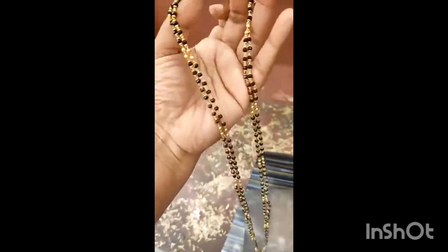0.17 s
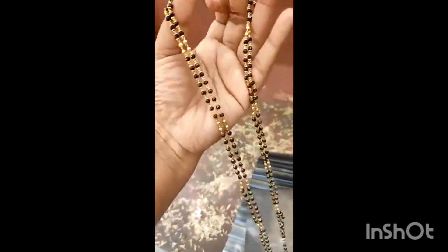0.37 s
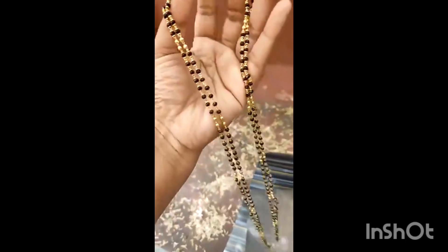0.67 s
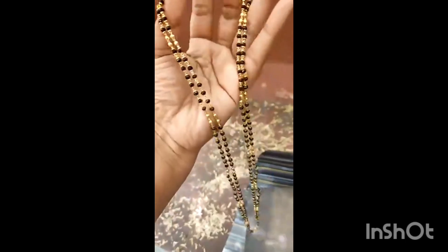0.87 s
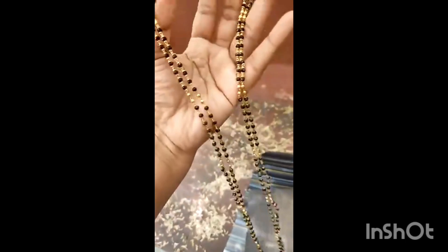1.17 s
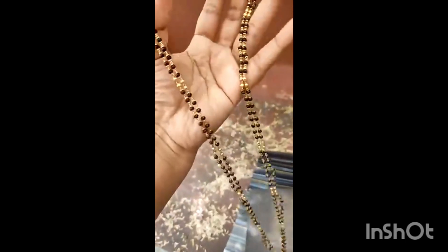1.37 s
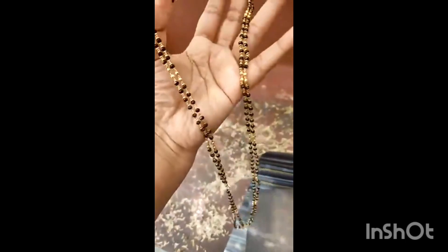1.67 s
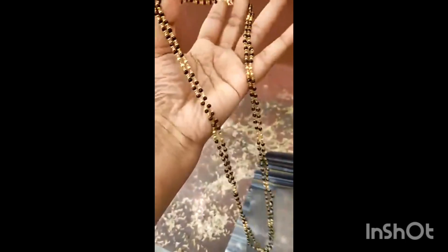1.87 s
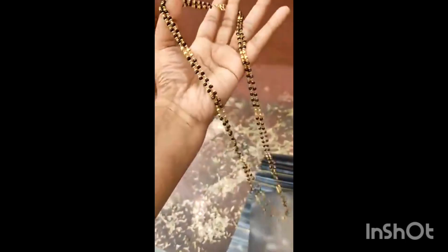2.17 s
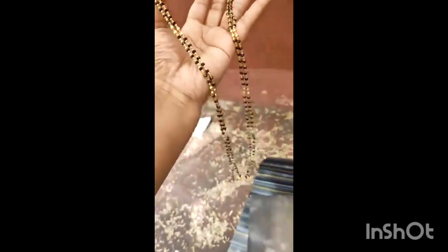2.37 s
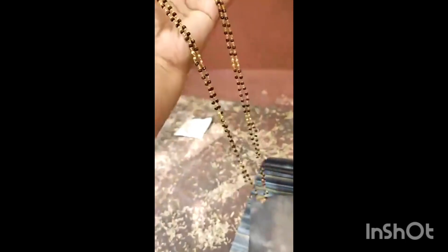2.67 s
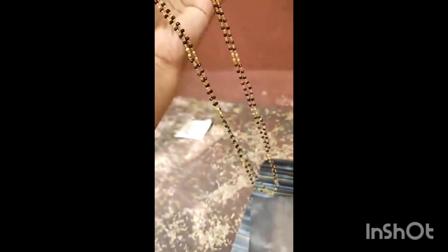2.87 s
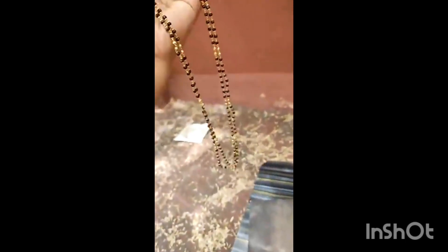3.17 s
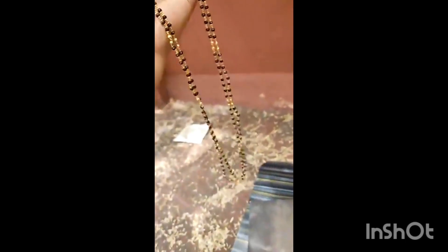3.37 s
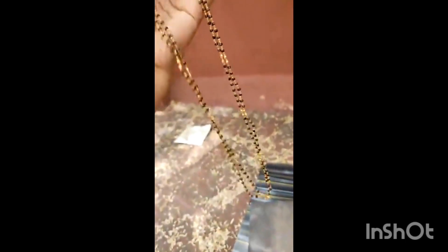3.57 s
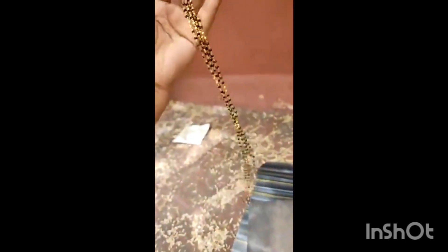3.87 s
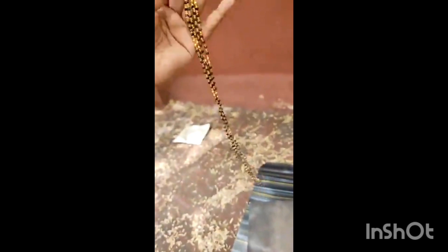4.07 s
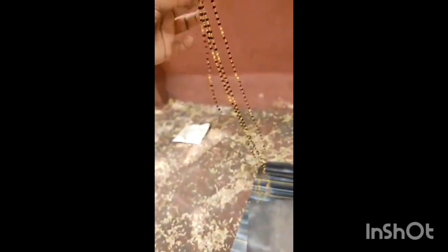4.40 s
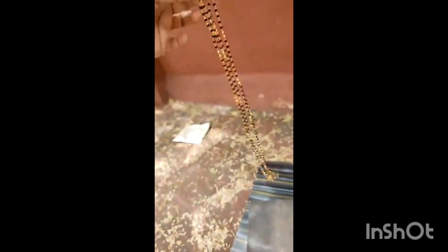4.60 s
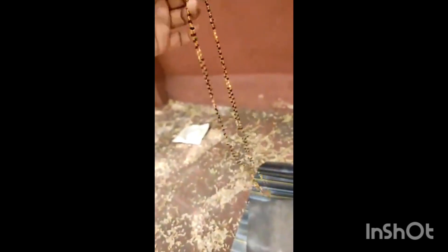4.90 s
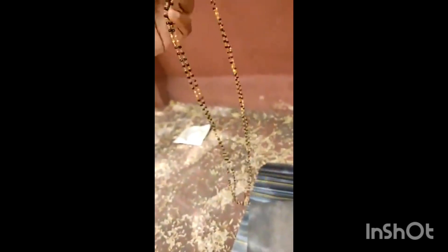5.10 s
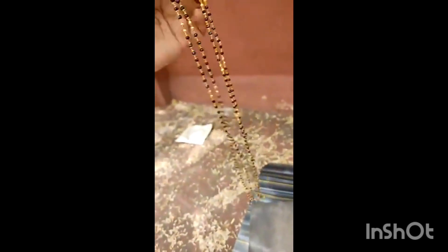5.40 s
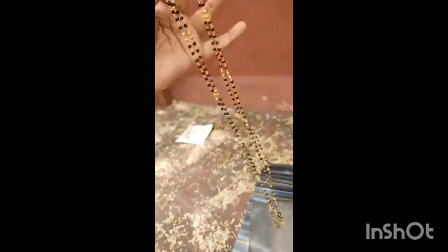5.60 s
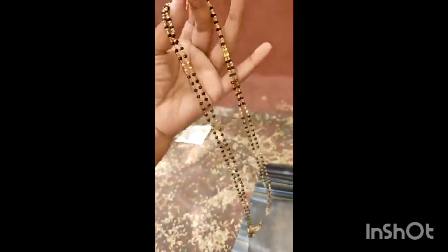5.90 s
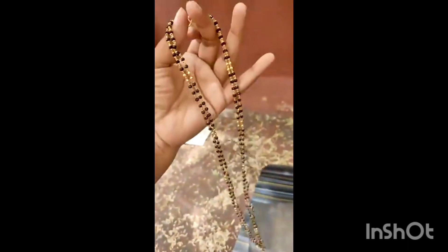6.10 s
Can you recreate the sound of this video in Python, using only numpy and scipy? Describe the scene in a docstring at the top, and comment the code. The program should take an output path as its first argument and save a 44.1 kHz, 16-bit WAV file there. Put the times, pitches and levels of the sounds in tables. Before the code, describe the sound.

A small room with a faint, steady hiss and barely audible thin tones, heard close in mono. At 0 seconds a soft skin rub, low microphone rumble and a light bump fade within about 0.2 seconds, with one faint clink. Quiet hiss holds until about 2.0, when the hand stirs. From 2.2 to 2.5 comes a busy flurry: beads slide and rasp, bright little clinks crowd together near a 2 kilohertz ring, and a strand gives a low short squeak. Single clinks follow around 2.9, 3.0, 3.25 and 3.35. From 3.5 to 4.7 the handling turns duller: soft bumps, dry ticks and rubs, strongest near 3.7 and 3.9, with a tiny high squeak at 3.85. A very faint thin whistle falls from 4.45 to 4.85. Hiss remains, with an almost inaudible clink at 5.4, until a hard, bright clack at 6.0, its tail cut short by the ending.

```python
"""Beaded chain handled above a workbench

A beaded gold chain is lifted and turned by hand, close to a mono microphone in a small shop.
Filtered noise and grains make the slides and rubs; damped sines and noise bursts make clinks, ticks, bumps
and, near the end, one hard clack. Squeaks and a thin whistle are gliding sines.
Under all lie a steady noise hiss and faint sine tones."""
import sys
import numpy as np
from scipy import signal
from scipy.fft import rfft, irfft, next_fast_len
from scipy.io import wavfile
from scipy.ndimage import uniform_filter1d, map_coordinates

SR = 44100
rng = np.random.default_rng(int(sys.argv[2]) if len(sys.argv) > 2 else 0)


def dump(signal):
    """Clip the signal to [-1, 1] and save it as 16-bit WAV at the path in sys.argv[1]."""
    limited = np.clip(np.atleast_2d(signal).T, -1, 1)
    pcm = np.round(limited * 32767).astype(np.int16)
    wavfile.write(sys.argv[1], SR, pcm)


N = 275625

# Spectrum of skin contact, for rubs and bumps. Each row: frequency in Hz, relative density in dB per Hz.
SKIN_SPECTRUM = [(50, -32.5), (120, -0.5), (230, 2.5), (320, 2.5), (480, 8.5), (700, 1), (1400, -40)]


def amp(db):
    """Amplitude ratio of a level in dB."""
    return 10 ** (np.asarray(db) / 20)


def unit(x):
    """x scaled to rms 1."""
    return x / np.sqrt(np.mean(x ** 2) + 1e-20)


def along(points, hz):
    """Interpolate (Hz, value) points on a log frequency axis."""
    point_hz, value = np.transpose(points)
    return np.interp(np.log(hz + 1), np.log(point_hz + 1), value)


def wobble(knots_per_s):
    """A smooth random curve through normally distributed knots."""
    knots = rng.standard_normal(int(N * knots_per_s / SR) + 4)
    return map_coordinates(knots, [np.arange(N) * knots_per_s / SR])


def colour(x, shape_db):
    """Causal minimum-phase filter, from the folded cepstrum of a gain in dB over frequency."""
    m = 2 * next_fast_len(len(x) // 2 + 4096)
    gain = amp(shape_db(np.fft.rfftfreq(m, 1 / SR)))
    cepstrum = irfft(np.log(gain + 1e-6))
    cepstrum[1:m // 2] *= 2
    cepstrum[m // 2 + 1:] = 0
    response = np.exp(rfft(cepstrum))
    return irfft(rfft(x, m) * response)[:len(x)]


def shaped(x, spectrum):
    """x filtered by the given spectrum, at rms 1."""
    return unit(colour(x, lambda hz: along(spectrum, hz)))


def fade(t60_s, attack_s):
    """Half a second of envelope: quick rise, exponential decay."""
    t = np.arange(SR // 2) / SR
    return np.exp(-np.log(1000) * t / t60_s) * (1 - np.exp(-t / attack_s))


def burst(shape_db, t60_s, attack_s):
    """A dying puff of coloured noise, with the energy of its envelope."""
    envelope = fade(t60_s, attack_s)
    puff = colour(rng.standard_normal(len(envelope)) * envelope, shape_db)
    return puff * np.linalg.norm(envelope) / np.linalg.norm(puff)


def ring(modes, attack_s):
    """Damped sine modes, struck at slightly new strengths and random phases each time."""
    t = np.arange(SR // 2) / SR
    out = np.zeros(len(t))
    for hz, level_db, t60_s in modes:
        strength = amp(level_db + rng.normal())
        sine = np.sin(2 * np.pi * (hz * t + rng.random()))
        out += strength * sine * fade(t60_s, attack_s)
    return out


def grains(contacts_per_s, smooth):
    """Tiny contacts of uneven size over a bed of friction noise at rms smooth."""
    contacts = rng.standard_normal(N) * (rng.random(N) < contacts_per_s / SR)
    return unit(contacts) + smooth * rng.standard_normal(N)


def resonant(x):
    """x coloured by the fixed resonances of strand and hand."""
    # Each row: centre in Hz, width in Hz, lift in dB.
    peaks = [(311, 85, 1.5), (449, 30, 6), (700, 26, 1.5), (996, 82, 2.5), (1324, 48, 4.5), (1655, 45, 7.5),
             (2160, 82, 5), (2530, 110, 5), (3360, 81, 5), (4340, 670, 2), (6900, 440, -7)]
    return colour(x, lambda f: sum(db / (1 + (2 * (f - hz) / width) ** 2) for hz, width, db in peaks))


def swells(rows, fall_db_per_s, level_column):
    """Gain per sample: each move rises along a Gaussian, then dies at a steady rate; powers add."""
    start_below_top_db = 20  # one rise time before the top
    t, power = np.arange(N) / SR, np.zeros(N)
    for row in rows:
        top_s, rise_s = row[:2]
        rise_db = start_below_top_db * ((top_s - t) / rise_s) ** 2
        fall_db = fall_db_per_s * (t - top_s)
        below_top_db = np.where(t < top_s, rise_db, fall_db)
        power += amp(row[level_column] - below_top_db) ** 2
    return np.sqrt(power)


def add(track, start_s, sound):
    """Mix a sound in at a time."""
    part = track[max(round(start_s * SR), 0):][:len(sound)]
    part += sound[:len(part)]


def reverb(x):
    """The shop's diffuse answer: delayed noise whose decay time depends on frequency."""
    # Each row: frequency in Hz, t60 in seconds.
    room_t60 = [(200, 0.54), (1000, 0.41), (3000, 0.49), (7000, 0.41), (14000, 0.31)]
    delay_s = 0.007
    hz, t, z = signal.stft(rng.standard_normal(SR // 2), SR, nperseg=256)
    decay = np.exp(-np.log(1000) * t / along(room_t60, hz)[:, None])
    tail = signal.istft(z * decay, SR, nperseg=256)[1]
    tail = np.concatenate([np.zeros(int(delay_s * SR)), tail / np.linalg.norm(tail)])
    return signal.fftconvolve(x, tail)[:len(x)]


def in_room(x, wet_db):
    """x followed by the shop's answer."""
    return x + amp(wet_db) * reverb(x)


def background():
    """Steady shaped-noise hiss with faint sine tones of slightly wavering phase."""
    # Each row: frequency in Hz, relative density in dB per Hz.
    hiss_spectrum = [(25, -3.5), (60, -3.5), (110, -19.5), (160, -10.5), (400, -11), (1350, -9), (1560, -3),
                     (2300, -0.5), (3500, -4), (4900, -11.5), (7400, -14.5), (8400, -20), (10700, -23.5),
                     (13000, -32), (15800, -33)]
    # Each row: frequency in Hz, rms level in dB.
    hum_tones = [(624, -85), (1561, -81), (1776, -87.5), (1906, -83.5), (2083, -76), (2482, -82),
                 (2638, -90.5), (2891, -78), (3451, -77.5), (5782, -83), (10476, -90.5), (14300, -107)]
    t = np.arange(N) / SR
    out = amp(-62.0) * shaped(rng.standard_normal(N), hiss_spectrum)
    for hz, rms_db in hum_tones:
        phase_rad = 2 * np.pi * hz * t + 0.65 * wobble(5.3)
        out += np.sqrt(2) * amp(rms_db) * np.sin(phase_rad)
    return out


def whistle():
    """A thin sine fades in, wanders mostly downward with a trembling pitch and fades out."""
    # Each row: time in seconds, pitch in Hz.
    pitch_path = [(4.44, 11200), (4.485, 11300), (4.525, 10500), (4.58, 11750), (4.625, 11600),
                  (4.68, 10200), (4.74, 9500), (4.78, 8850), (4.87, 8300)]
    level_db, fade_s, tremble_hz = -77, 0.04, 20
    t = np.arange(N) / SR
    s, pitch_hz = np.transpose(pitch_path)
    glide_hz = uniform_filter1d(np.interp(t, s, pitch_hz), size=1000) + tremble_hz * wobble(300)
    envelope = np.clip(np.minimum(t - s[0], s[-1] - t) / fade_s, 0, 1)
    return envelope * amp(level_db) * np.sin(2 * np.pi * np.cumsum(glide_hz) / SR)


def hand():
    """Skin rubs and scrapes as resonant grains; the held microphone sways as low noise."""
    # Each row: top in seconds, rise in seconds, relative skin level in dB, relative scrape level in dB.
    rubs = [(0, .02, -44.5, -54), (0.065, 0.066, -44, -54), (1.975, 0.013, -49, -63),
            (2.05, 0.054, -51.5, -56), (2.13, 0.14, -52, -55), (2.22, 0.058, -37, -37.5),
            (2.32, 0.093, -38.5, -50.5), (2.385, 0.099, -65, -36), (2.47, 0.069, -64, -39),
            (3.54, 0.14, -58, -59.5), (3.65, 0.029, -66, -55), (3.79, 0.12, -54, -51.5),
            (3.93, 0.046, -50, -50), (4.13, 0.21, -46.5, -49), (4.21, 0.066, -45, -45),
            (4.39, .025, -45.5, -53), (4.55, .08, -70, -82), (4.665, 0.01, -61, -64)]
    # Jolts of the microphone. Each row: top in seconds, rise in seconds, relative rumble level in dB.
    jolts = [(0, .02, -38.5), (0.18, 0.1, -59), (0.32, 0.09, -71), (2.0, 0.045, -55), (2.2, 0.11, -47),
             (2.38, 0.083, -51), (2.5, 0.15, -54), (2.69, 0.062, -63.5)]
    # Each row: frequency in Hz, relative density in dB per Hz.
    scrape_spectrum = [(400, -30), (700, -1), (950, 1.5), (1600, -4.5), (2200, -6), (4000, -45)]
    # Sway of the microphone. Each row: frequency in Hz, relative density in dB per Hz.
    rumble_spectrum = [(12, -18), (28, -14), (38, 1.5), (49, -4.5), (75, -25), (130, -16), (200, -39),
                       (600, -95)]
    rub_fall_db_per_s, jolt_fall_db_per_s = 188, 150

    skin_grains = resonant(grains(contacts_per_s=500, smooth=1.0))
    rub = swells(rubs, rub_fall_db_per_s, level_column=2) * shaped(skin_grains, SKIN_SPECTRUM)
    scrape_grains = resonant(grains(contacts_per_s=700, smooth=0.86))
    scrape = swells(rubs, rub_fall_db_per_s, level_column=3) * shaped(scrape_grains, scrape_spectrum)
    rumble = shaped(rng.standard_normal(N), rumble_spectrum)
    sway = swells(jolts, jolt_fall_db_per_s, level_column=2) * rumble
    return amp(-5.0) * rub + amp(-2.5) * scrape + amp(-1.5) * sway


def squeaks():
    """A dragged strand catches for a moment and sings at an unsteady pitch."""
    # Each row: middle in seconds, length in seconds, pitch in Hz, level in dB.
    squeak_rows = [(2.298, 0.082, 668, -46), (2.306, 0.069, 458, -41.5), (3.85, 0.044, 1695, -51),
                   (3.854, 0.02, 2364, -39.5), (3.869, 0.0084, 3380, -39.5), (3.877, 0.017, 2110, -42.5)]
    pitch_scatter = 0.028  # share of the pitch
    out, t = np.zeros(N), np.arange(N) / SR
    for middle_s, length_s, hz, level_db in squeak_rows:
        swell = np.exp(-(2 * (t - middle_s) / length_s) ** 2)
        pitch_hz = hz * (1 + pitch_scatter * wobble(440))
        out += amp(level_db) * swell * np.sin(2 * np.pi * np.cumsum(pitch_hz) / SR)
    return in_room(out, wet_db=-22)


def bumps():
    """Soft bumps of the hand: a low mode that flesh damps quickly, and a puff of skin noise."""
    # Each row: start in seconds, relative level in dB.
    bump_rows = [(0.05, -35.5), (0.071, -44), (1.967, -52), (2.739, -49), (3.542, -46.5), (3.635, -43.5),
                 (3.686, -31.5), (3.904, -28.5), (4.018, -36), (4.226, -33.5), (4.39, -39.5),
                 (4.465, -45.5), (4.513, -39)]
    thud_hz, pitch_scatter = 294.3, 0.12  # scatter as a share of the pitch
    out = np.zeros(N)
    for start_s, level_db in bump_rows:
        hz = thud_hz * (1 + pitch_scatter * rng.normal())
        thud = ring([(hz, 0, 0.042)], attack_s=0.0022)
        pat = burst(lambda f: along(SKIN_SPECTRUM, f), t60_s=0.012, attack_s=0.00057)
        add(out, start_s, in_room(amp(level_db + 2.5) * (thud + amp(-7.0) * pat), wet_db=-5.5))
    return out


def ticks():
    """The strand sticks and slips over skin: short, dull noise bursts, each with one damped mode."""
    # Each row: start in seconds, relative level in dB, centre in Hz.
    tick_rows = [(0.043, -35.5, 590), (3.686, -31, 890), (3.905, -29, 1010), (4.131, -35, 494),
                 (4.144, -31, 504), (4.176, -32, 564), (4.187, -33.5, 1150), (4.222, -33.5, 1030),
                 (4.314, -37, 523), (4.365, -32, 560), (4.372, -35.5, 820), (4.395, -33.5, 681),
                 (4.652, -39, 527)]
    # Each row: frequency in Hz, relative density in dB per Hz.
    tick_spectrum = [(100, -27.5), (400, 7), (900, 7), (1650, 1.5), (2300, -8), (6000, -26), (12000, -42)]
    out = np.zeros(N)
    for start_s, level_db, hz in tick_rows:
        snap = burst(lambda f: along(tick_spectrum, f), t60_s=0.013, attack_s=0.0007)
        tone = ring([(hz, -5, 0.016)], attack_s=0.00011)
        add(out, start_s, in_room(amp(level_db + 1.5) * (snap + tone), wet_db=-9.0))
    return out


def sliding():
    """Beads run over one another as resonant grains; fine links glitter above as denser, brighter grains."""
    # Each row: top in seconds, rise in seconds, relative bead level in dB, relative sparkle level in dB.
    slides = [(0.02, 0.059, -52.5, -72), (0.12, 0.055, -56.5, -66.5), (2.06, 0.063, -51, -72),
              (2.19, 0.075, -48, -71), (2.225, 0.034, -36, -68), (2.37, 0.064, -37.5, -57),
              (2.47, 0.13, -41.5, -63), (2.9, 0.08, -47.5, -64), (2.99, .04, -51, -65),
              (3.26, 0.22, -56.5, -71.5), (3.41, 0.14, -52, -65.5), (3.53, 0.22, -58, -67.5),
              (3.7, 0.045, -46.5, -61), (3.865, 0.11, -43.5, -56), (4.0, 0.23, -50, -63),
              (4.23, .15, -54, -67.5), (4.4, 0.11, -58, -71.5), (4.62, .27, -59, -75)]
    # Each row: frequency in Hz, relative density in dB per Hz.
    bead_spectrum = [(880, -8.5), (1500, -9.5), (2200, -2), (4000, -2), (4700, -5.5), (5200, -8),
                     (7400, -12), (9000, -28), (12000, -44)]
    # Each row: frequency in Hz, relative density in dB per Hz.
    sparkle_spectrum = [(4000, -17), (6500, 5), (9000, -2.5), (12000, -13.5), (15800, -29)]
    fall_db_per_s = 111

    bead_grains = resonant(grains(contacts_per_s=700, smooth=1.0))
    beads = swells(slides, fall_db_per_s, level_column=2) * shaped(bead_grains, bead_spectrum)
    link_grains = grains(contacts_per_s=1400, smooth=1.0)
    links = swells(slides, fall_db_per_s, level_column=3) * shaped(link_grains, sparkle_spectrum)
    return amp(-3.0) * beads + amp(3.5) * links


def clinks():
    """Each light contact cracks with its own spectral tilt and rings near 2 kHz, with upper modes."""
    # Each row: start in seconds, then relative levels and pitch:
    # level in dB, ring in Hz, ring level in dB, knock level in dB, treble level in dB.
    clink_rows = [(0.118, -43, 2100, -24, -13, 13), (2.203, -22, 2340, -7, -27, -35),
                  (2.2064, -18.5, 2180, -15.5, -43, -25), (2.330, -30, 2370, -7.5, -21, -27),
                  (2.335, -25, 2164, -5.5, 1, -36), (2.3555, -25.5, 2160, -18, -13, -10),
                  (2.364, -25, 2190, -15, -2, -21), (2.3845, -22.5, 2144, -6, 5, -23),
                  (2.401, -24, 2300, -22, -14, -21), (2.4622, -26.5, 2150, -26, -1, -25),
                  (2.864, -26.5, 2098, 1.5, -17, -4), (2.8954, -37.5, 2160, 0, 24, 0),
                  (2.992, -35, 2096, 1, -3, 4), (3.2453, -19.5, 2227, -8, -29, -4.5),
                  (3.3482, -26, 2094, -9.5, -2, -3), (5.429, -49, 2220, -20, -20, -15)]
    # Upper modes. Each row: frequency in Hz, relative level in dB, t60 in seconds.
    overtones = [(1330, -17.5, 0.066), (1415, -13.5, 0.035), (2406, -8, 0.017), (3215, -2, 0.028),
                 (3800, -13, 0.033), (4440, -4, 0.049), (4680, -13, 0.018), (5850, -18, 0.042),
                 (6800, -23, 0.02)]
    # Each row: frequency in Hz, relative density in dB per Hz.
    contact_spectrum = [(200, -36), (900, -19), (1400, -2), (2400, 6.5), (4500, 6), (5400, -4),
                        (7500, -12.5), (8500, -19.5), (15000, -39.5)]
    overtones_db = -1.5
    out = np.zeros(N)
    for start_s, level_db, hz, ring_db, knock_db, treble_db in clink_rows:
        tilt = [(1200, knock_db + 16), (2400, 0.0089), (4600, 0), (7500, treble_db + 9.5)]
        crack = burst(lambda f: along(contact_spectrum, f) + along(tilt, f), t60_s=0.034, attack_s=0.0003)
        tone = ring([(hz, ring_db + 9.5, 0.055)], attack_s=0.00057)
        tone += amp(overtones_db) * ring(overtones, attack_s=0.00026)
        add(out, start_s, in_room(amp(level_db - 5.5) * (amp(0.5) * crack + tone), wet_db=-9.5))
    return out


def clack():
    """One hard, bright blow: crack plus modes; the room gathers the crack from all directions, evenly."""
    # Each row: frequency in Hz, relative density in dB per Hz.
    crack_spectrum = [(150, -52), (320, -44), (520, -23), (800, -25), (1230, -20), (1700, -18),
                      (2200, -7.5), (3200, -3.5), (4500, -9.5), (5400, -11), (7500, -8.5), (8400, -24),
                      (10300, -20), (12000, -33), (15800, -39)]
    # Each row: frequency in Hz, relative level in dB, t60 in seconds.
    ringing_modes = [(1270, -16, 0.05), (2180, -11, 0.22), (2940, -10, 0.038), (3200, -6, 0.053),
                     (3296, -7, 0.075), (3770, -5, 0.026), (5430, -9, 0.036), (6100, -22, 0.028),
                     (7320, -3.5, 0.024), (7530, -6, 0.037), (9100, -19, 0.044), (10150, -18, 0.022)]
    start_s, level_db, modes_db, room_db = 5.9917, -12.5, -7, -3.5
    out = np.zeros(N)
    crack = burst(lambda f: along(crack_spectrum, f), t60_s=0.023, attack_s=0.00073)
    # The room is fed a filtered impulse of the crack's energy, so its tail has an even spectrum.
    even = colour(signal.unit_impulse(len(crack)), lambda f: along(crack_spectrum, f))
    even *= np.linalg.norm(crack) / np.linalg.norm(even)
    modes = amp(modes_db) * ring(ringing_modes, attack_s=0.00079)
    blow = crack + modes + amp(room_db) * reverb(even + modes)
    add(out, start_s, amp(level_db) * blow)
    return out


def scene():
    """All sources sum at one microphone, copied to two channels."""
    mono = background() + whistle() + hand() + squeaks() + bumps() + ticks() + sliding() + clinks() + clack()
    return np.array([mono, mono])


def record(dry):
    """Nothing is kept at or above the band limit."""
    top_hz = 15800
    m = next_fast_len(N + SR // 2)
    passband = np.fft.rfftfreq(m, 1 / SR) < top_hz
    return irfft(rfft(dry, m) * passband, m)[:, :N]


dry = scene()
out = record(dry)
dump(out)
```